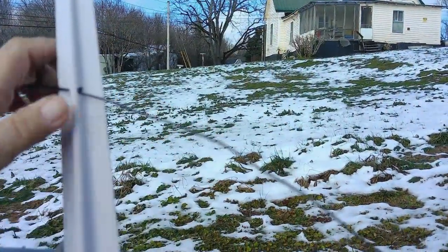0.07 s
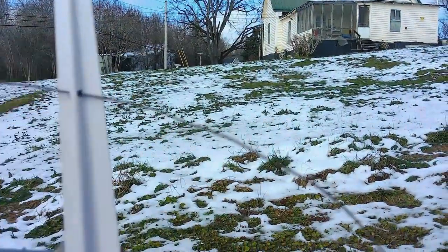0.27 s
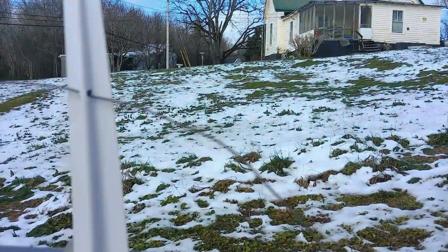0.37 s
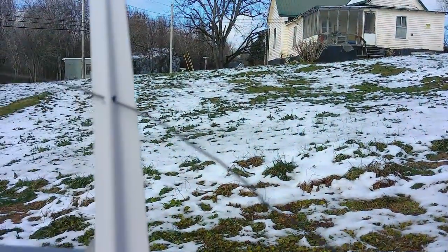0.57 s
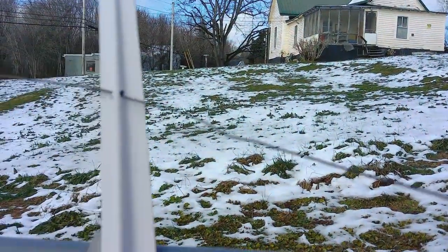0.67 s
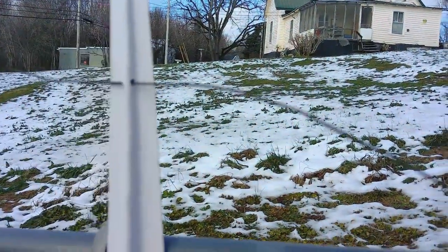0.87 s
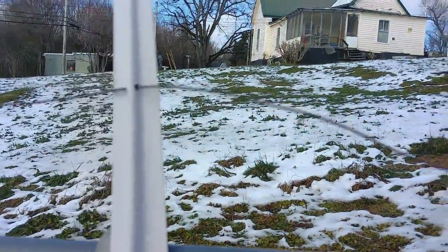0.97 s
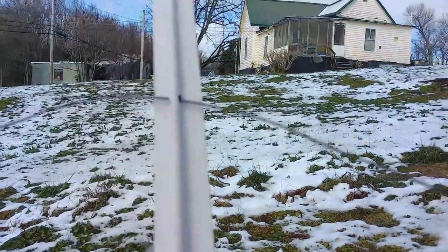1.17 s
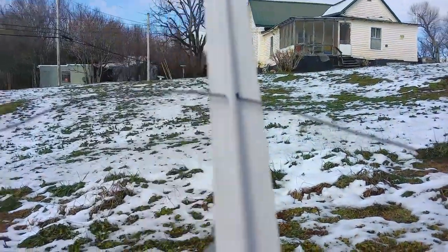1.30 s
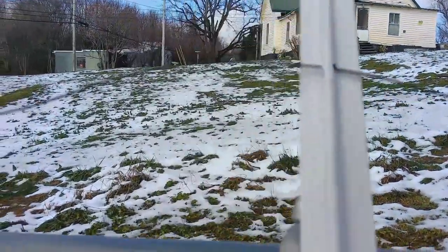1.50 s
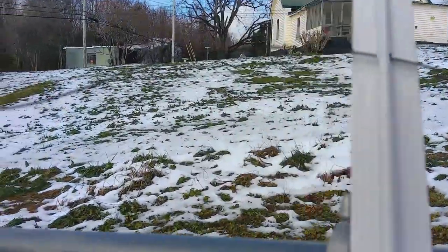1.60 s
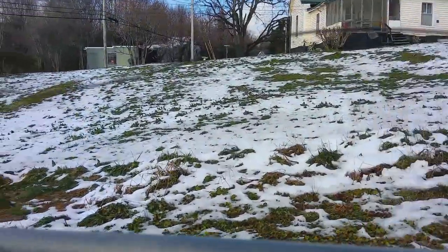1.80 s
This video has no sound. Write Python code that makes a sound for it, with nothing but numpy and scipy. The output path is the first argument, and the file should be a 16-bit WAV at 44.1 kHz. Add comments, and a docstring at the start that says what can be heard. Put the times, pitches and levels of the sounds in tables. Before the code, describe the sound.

A metal fence wire scrapes through a plastic post, close by. After a light knock, it rubs from about 0.2 seconds with a bright jingle, short high squeaks and small snaps, the taut wire ringing faintly. The sharpest snaps come around 0.8 seconds, then the rubbing weakens and stops by 1.4. One short, duller scrape follows at 1.6 seconds, over quiet, low outdoor noise.

```python
"""Fence wire dragged through a post

Outdoors on a quiet day, a shaken steel wire drags through its hole in a plastic post. It rubs in a
dense run of tiny slips, squeaks, catches and snaps free; wire and post jingle with high resonances
and the span sings on a few lower notes. One last, duller scrape follows."""
import sys
import numpy as np
from scipy import signal
from scipy.fft import rfft, irfft
from scipy.io import wavfile
from scipy.ndimage import uniform_filter1d, minimum_filter1d, map_coordinates

SR = 44100
rng = np.random.default_rng(int(sys.argv[2]) if len(sys.argv) > 2 else 0)


def to_wav(s):
    """Save 16-bit WAV."""
    ch = np.atleast_2d(s).T  # columns
    pcm = np.round(np.clip(ch, -1, 1) * 32767)  # PCM
    wavfile.write(sys.argv[1], SR, pcm.astype(np.int16))


N = 81585
TIME = np.arange(N) / SR
JUDDER_PER_S = 170  # pace of the level flutter in rubbing and squeaks


def amp(db):
    """Decibels to gain."""
    return 10 ** (np.asarray(db) / 20)


def unit(x):
    """Scale to rms 1."""
    return x / np.sqrt(np.mean(x ** 2) + 1e-20)


def curves(rows):
    """Automation lanes: one value per sample for each column after the time."""
    times, *columns = np.transpose(rows)
    return [np.interp(TIME, times, column) for column in columns]


def wobble(per_s):
    """A smooth random modulator with per_s knots a second."""
    return map_coordinates(rng.standard_normal(4096), [np.arange(N) * per_s / SR], mode="wrap")


def tone(hz):
    """A sine of rms 1 that follows a pitch curve."""
    return np.sqrt(2) * np.sin(2 * np.pi * (np.cumsum(hz) / SR + rng.random()))


def colour(x, points, size=2048):
    """Minimum-phase EQ of unit energy through (f/Hz, level/dB) points."""
    hz, db = np.transpose(points)
    gain = amp(np.interp(np.log(np.fft.rfftfreq(size, 1 / SR) + 1), np.log(hz), db))
    cepstrum = irfft(np.log(gain))
    cepstrum[1:size // 2] *= 2
    cepstrum[size // 2 + 1:] = 0
    impulse = irfft(np.exp(rfft(cepstrum)))
    return signal.fftconvolve(x, impulse / np.linalg.norm(impulse))[:len(x)]


def resonate(x, hz, width, skirt_hz=916):
    """One resonance, its sides steepened by a wider band-pass; keeps the power of white noise."""
    for bandwidth in (width, skirt_hz):
        x = signal.lfilter(*signal.iirpeak(hz, hz / bandwidth, SR), x)
    return x * np.sqrt(SR / np.pi * (1 / width + 1 / skirt_hz))


def slips(per_s=2200, spread_db=5):
    """Tiny stick-slip impulses of uneven size at random moments, rms 1."""
    slipping = rng.random(N) < per_s / SR
    strength = amp(spread_db * rng.standard_normal(N))
    return unit(slipping * strength * rng.choice([-1, 1], N))


def rubbed(force, modes, wander_db=3):
    """Slips ring the resonances; the contact point moves and favours now one, now another."""
    out = np.zeros(N)
    for hz, width, db in modes:
        drive = unit(slips() * amp(wander_db * wobble(per_s=70)))
        out += amp(db) * resonate(force * drive, hz, width)
    return out / np.linalg.norm([amp(db) for _, _, db in modes])


# EQ of the outdoor ambience: f/Hz, level/dB
AIR_EQ = [(20,-17), (45,-11), (62,-2), (85,-8.5), (110,-3), (260,-0.5), (450,-6.5), (900,-5), (1700,-11),
          (2700,-10.5), (4000,-16), (8000,-21), (12500,-26)]
# Fader ride of the ambience: t/s, level/dB
AIR_RIDE = [(0, -44), (.62, -43.5), (.86, -47.5), (1.1, -48.5), (1.5, -44), (1.85, -44.5)]

def air(trim_db=3):
    """A quiet outdoor bed of dark noise, slightly uneven in level."""
    level_db, = curves(AIR_RIDE)
    gain = amp(trim_db + level_db + 2.0 * wobble(per_s=10.76))
    bed = colour(rng.standard_normal(N + SR), AIR_EQ, size=8192)[SR:]
    return gain * unit(bed)


# Handling bumps: centre t/s, length/s, level/dB
HAND_BUMPS = [(1.305, 0.036, -41), (1.602, 0.3, -47), (1.823, .025, -46)]
# Their bassy EQ: f/Hz, level/dB
BUMP_EQ = [(40, -21), (110, -8), (170, 3), (260, -1.5), (400, -16), (1000, -47)]

def handling():
    """Soft swells of low noise as the hand moves."""
    swell = sum(amp(db) * np.cos(np.pi * np.clip((TIME - centre) / length, -.5, .5))
                for centre, length, db in HAND_BUMPS)
    return swell * unit(colour(rng.standard_normal(N), BUMP_EQ))


# Singing notes of the stretched span: f/Hz, width/Hz, level/dB
SPAN_MODES = [(1543, 17, 1.5), (1654, 10.7, 4), (2860, 5.5, -9)]
# How hard they are driven: t/s, level/dB
SPAN_RIDE = [(0.14, -65), (0.158, -51), (0.226, -44.5), (0.358, -54), (0.386, -35.5), (0.658, -37.5),
             (0.692, -29), (0.756, -47), (1.23, -44.5), (1.32, -36), (1.404, -48.5), (1.5, -63)]
# The span's lowest notes, plucked together: f/Hz, t60/s, level/dB
PLUCKED_NOTES = [(882, 0.51, -40), (1001, 3.3, -42), (1218, 3.2, -51)]

def span(trim_db=1, pluck_s=0.38, attack_s=0.0017, sag_per_s=0.027):
    """The taut wire sings as it is rubbed; its lowest notes, plucked once, ring on and sag in pitch."""
    level_db, = curves(SPAN_RIDE)
    out = amp(trim_db) * rubbed(amp(level_db), SPAN_MODES, wander_db=1.0)
    age = np.maximum(TIME - pluck_s, 0)
    attack = 1 - np.exp(-age / attack_s)
    for hz, t60, db in PLUCKED_NOTES:
        decay = amp(db - 60 * age / t60 + 1.3 * wobble(per_s=28.5))
        pitch = hz * (1 - sag_per_s * age + 0.004 * wobble(per_s=120))
        out += attack * decay * tone(pitch)
    return out


# Body of the post, its lower resonances: f/Hz, width/Hz, level/dB
POST_MODES = [(1560, 160, -4.5), (1825, 90, -6.5), (2140, 17, -4), (2398, 47, 2.5), (2480, 13, -10),
              (2672, 19, -4.5), (2810, 19, -2.5), (2889, 10, -9), (3490, 23, 2.5), (3596, 30, -2.5),
              (3780, 29, -2), (4650, 73, -1)]
# EQ of the bright contact grit: f/Hz, level/dB
GRIT_EQ = [(300, -29.5), (1000, -21), (2000, -15.5), (3600, -3.5), (4450, -20.5), (5400, -8.5), (6300, 0.5),
           (7600, -1.5), (8500, -4), (9500, -6), (10300, -6.5), (10900, -37), (13000, -30.5)]
# EQ of the dull contact noise: f/Hz, level/dB
DULL_EQ = [(100, -30.5), (500, -10), (1200, -7.5), (2400, -0.5), (3600, -4), (6000, -4), (10000, -16.5),
           (13000, -58)]
# Dry cracks at the post, a light tick and then the wire twice snapping free: t/s, body level/dB, grit level/dB
DRY_CRACKS = [(0.0437, -28, -40), (0.3012, -33, -13), (0.9089, -27.5, -18)]

def cracks(t60_s=0.032, size=4096):
    """Dry cracks at the post: a light tick, and the wire snapping free with a crack and a brief ring of the
    plastic."""
    out = np.zeros(N + size)
    for start, body_db, grit_db in DRY_CRACKS:
        crack = amp(-60 * TIME[:size] / t60_s) * rng.standard_normal(size)
        ring = sum(amp(db) * resonate(crack, hz, width) for hz, width, db in POST_MODES) / 2
        body = colour(crack, DULL_EQ) + amp(-2.5) * ring
        out[round(start * SR):][:size] += amp(body_db) * body + amp(grit_db) * colour(crack, GRIT_EQ)
    return out[:N]


# Squeak cues: centre t/s, length/s, f/Hz, glide/Hz, level/dB
SQUEAK_CUES = [(0.252, 0.013, 6330, -100, -14), (0.282, .024, 3934, 76, -29), (.304, 0.016, 2410, 1.5, -22),
               (.305, 0.011, 4025, 0.5, -22.5), (0.325, 0.021, 3980, 64, -36),
               (0.349, 0.018, 8240, -4, -16.5), (0.364, 0.032, 4040, -5.5, -34),
               (0.402, 0.024, 8600, 1, -20.5), (0.424, 0.02, 4000, 76.5, -27),
               (0.465, 0.017, 10170, 0.5, -27), (.471, 0.027, 3925, 0, -22),
               (0.542, 0.019, 8320, -0.5, -29), (0.631, 0.045, 4040, 91, -38), (0.69, 0.0093, 1670, 1, -23),
               (.723, 0.02, 8580, -0.5, -15.5), (0.748, 0.04, 8650, -1, -18),
               (0.8233, 0.0083, 6280, -400, -2.5), (.843, 0.025, 10050, -1, -11),
               (0.911, .012, 3990, 0, -21), (0.931, 0.0416, 2765, -800, -30), (0.98, 0.12, 3974, -1.5, -31),
               (0.984, 0.018, 8600, 4, -24.5), (1.008, 0.05, 10020, 7.5, -22.5),
               (1.024, 0.017, 3885, -2, -24.5), (1.063, 0.056, 3900, 64.5, -33.5),
               (1.122, 0.022, 3700, -76.5, -22.5), (1.149, 0.024, 3940, 4, -26.5),
               (1.205, 0.098, 3840, -68, -37), (1.294, 0.074, 4010, 112, -31)]

def squeaks(trim_db=-2, flutter_db=3, jitter=0.018):
    """The wire sticks and slips in step with a resonance: short, unsteady tones that swell and glide."""
    out = np.zeros(N)
    for centre, length, hz, glide, db in SQUEAK_CUES:
        position = np.clip((TIME - centre) / length, -.5, .5)
        pitch = (hz + glide * position) * (1 + jitter * wobble(per_s=510))
        gain = amp(db + trim_db + flutter_db * wobble(JUDDER_PER_S))
        out += gain * np.cos(np.pi * position) * tone(pitch)
    return out


# The jingle, high resonances of wire and post: f/Hz, width/Hz, level/dB
JINGLE_MODES = [(3968, 130, -0.5), (5077, 85, -6.5), (5310, 18, -6), (5838, 160, 2), (6220, 47, -1),
                (6624, 140, 1), (6696, 85, -4), (7020, 27, -3), (7840, 51, -13), (8430, 155, 1),
                (8700, 28, -4), (8916, 60, -6.5), (10130, 42, -4), (11580, 35, -12.5)]
# Snap cues: t/s, level/dB, favoured f/Hz
SNAP_CUES = [(0.2482, -5, 6230), (0.2517, -7, 6400), (0.3143, -7, 6720), (0.3481, -4.5, 8000),
             (0.3668, -3.5, 8020), (0.3807, -4.5, 8600), (0.4204, -21, 6850), (0.4754, -11, 7170),
             (0.5145, -6, 6210), (0.5237, -18, 8260), (0.5955, -5.5, 8620), (0.6074, -13, 8630),
             (0.6399, -8, 5710), (0.6572, -13.5, 8590), (0.6743, -7.5, 5850), (0.7205, -5.5, 8700),
             (0.7868, -8, 8640), (0.821, 6.5, 8870), (0.8274, -4, 6370), (0.8384, -1, 10240),
             (0.8494, -2.5, 6300)]

def snaps(trim_db=-4, t60_s=0.016, attack_s=0.00013, focus_hz=710, size=4096):
    """The wire snaps free: a rough chirp, and chatter that rings the resonances near its pitch most."""
    out, age = np.zeros(N + size), TIME[:size]
    envelope = amp(-60 * age / t60_s) * (1 - np.exp(-age / attack_s))
    for start, db, pitch in SNAP_CUES:
        chatter = envelope * rng.standard_normal(size)
        ring = sum(amp(mode_db) / (1 + ((hz - pitch) / focus_hz) ** 2) * resonate(chatter, hz, width)
                   for hz, width, mode_db in JINGLE_MODES)
        chirp = envelope * tone(pitch * (1 + 0.018 * wobble(per_s=1500)[:size]))
        grit = colour(chatter, GRIT_EQ)
        snap = unit(ring) + amp(-0.5) * unit(chirp) + amp(-7) * unit(grit)
        out[round(start * SR):][:size] += amp(db + trim_db) * snap / np.abs(snap).max()
    return out[:N]


def sticking(duck_db=-2.5, lead_s=0.007, width_s=0.0024):
    """A gain that ducks just before each snap, while the wire is caught."""
    dips = [np.exp(-((TIME - start + lead_s) / width_s) ** 2) for start, _, _ in SNAP_CUES]
    return amp(duck_db * np.max(dips, axis=0))


def stroke(rows, fade_s=0.02):
    """Force on the bright and the dull layer during one stroke, fading to silence either side."""
    level_db, dull_offset_db = curves(rows)
    inside_s = np.minimum(TIME - rows[0][0], rows[-1][0] - TIME)
    touching = np.clip(inside_s / fade_s + 1, 0, 1)
    return touching * amp([level_db, level_db + dull_offset_db])


# Force of the main drag: t/s, bright level/dB, dull layer's offset/dB
DRAG_RIDE = [(0.14, -51, -1), (0.206, -27, -13.5), (0.242, -28, -5.5), (0.25, -25, -28),
             (0.268, -21.5, -12), (0.286, -22, -10), (0.294, -49, 0), (0.3, -15, -16), (0.316, -15.5, -16),
             (0.334, -22, -19), (0.37, -16.5, -15), (0.396, -24.5, -4.5), (0.408, -18, -13),
             (0.44, -20.5, -32), (0.474, -13.5, -14.5), (0.488, -21.5, -7.5), (0.62, -20, -11),
             (0.708, -32.5, 1.5), (0.72, -20.5, -16), (0.764, -23, -9), (0.786, -14.5, -11.5),
             (0.8, -34, 0.5), (0.822, -3.5, -20.5), (0.848, -11, -25.5), (0.874, -30, -6.5),
             (0.94, -19, -12), (0.962, -32, -2.5), (1.014, -24, -8), (1.044, -36.5, -4),
             (1.076, -20, -19.5), (1.094, -29.5, -4), (1.124, -25.5, -7), (1.176, -40, 2.5),
             (1.212, -30.5, -13), (1.234, -35.5, -7.5), (1.308, -24, -8.5), (1.342, -37.5, -1.5),
             (1.37, -22.5, -10), (1.43, -64, 16), (1.46, -52.5, 6.5)]
# Force of the last scrape and a faint rub after it: t/s, bright level/dB, dull layer's offset/dB
SCRAPE_RIDE = [(1.555, -57, 0), (1.592, -25, -6), (1.622, -31.5, 1), (1.642, -42, -0.5),
               (1.675, -60.5, 9.5), (1.71, -56, 2), (1.733, -52, 5.5), (1.79, -65, -4)]

def rubbing(grip_db=-10.5, judder_db=1.5):
    """The wire judders through the hole, then scrapes again: bright jingle and grit over a dull body."""
    drag = stroke(DRAG_RIDE)
    drag[0] = np.minimum(drag[0], amp(grip_db)) * sticking()  # the grip caps the bright layer's force
    judder = unit(amp(judder_db * wobble(JUDDER_PER_S)))
    bright_force, dull_force = judder * (drag + stroke(SCRAPE_RIDE))
    jingle = amp(-2) * rubbed(bright_force, JINGLE_MODES)
    grit = amp(-7) * colour(bright_force * slips(), GRIT_EQ)
    body = amp(-1.5) * rubbed(dull_force, POST_MODES)
    rasp = amp(-2.5) * colour(dull_force * slips(), DULL_EQ)
    return jingle + grit + body + rasp


def scene():
    """Wire, post, hand and ambience in a mono mix."""
    return (rubbing() + squeaks() + span() + snaps() + cracks() + handling() + air())[None]


def record(dry, mic_hz=11900, ceiling=1.06, window=45, top_hz=15700):
    """Microphone treble roll-off, a fast limiter that lets the hardest peaks just clip, a high cut."""
    heard = signal.sosfilt(signal.butter(16, mic_hz, fs=SR, output="sos"), dry)
    needed_gain = ceiling / np.maximum(np.abs(heard), ceiling)
    gain = uniform_filter1d(minimum_filter1d(needed_gain, window), window)
    clipped = np.clip(heard * gain, -1, 1)
    return signal.sosfilt(signal.ellip(10, .1, 80, top_hz, fs=SR, output="sos"), clipped)


dry = scene()
out = record(dry)
to_wav(out)
```